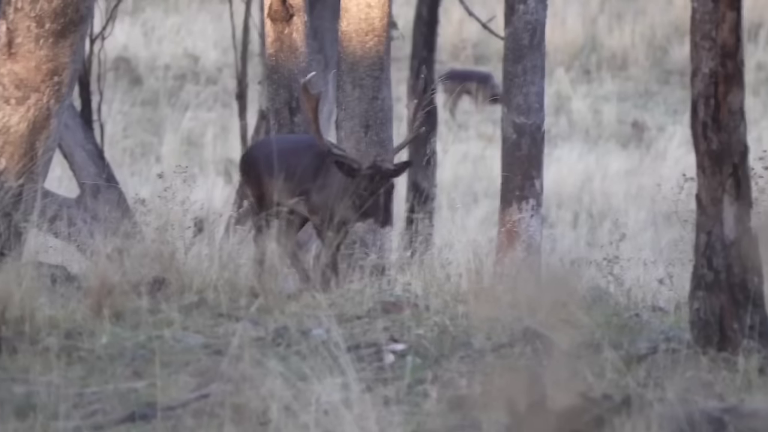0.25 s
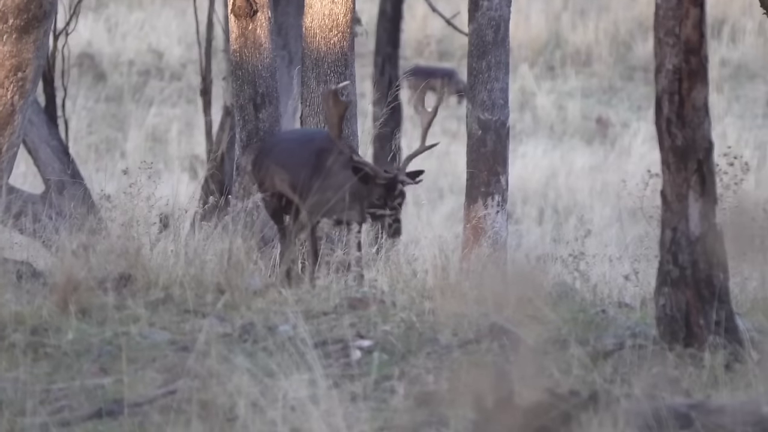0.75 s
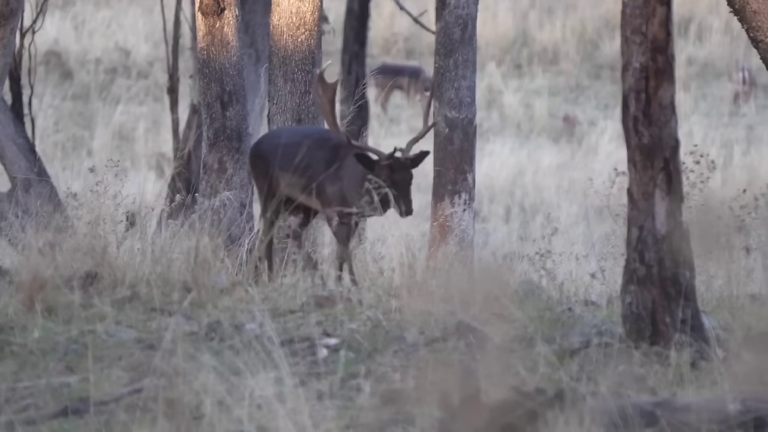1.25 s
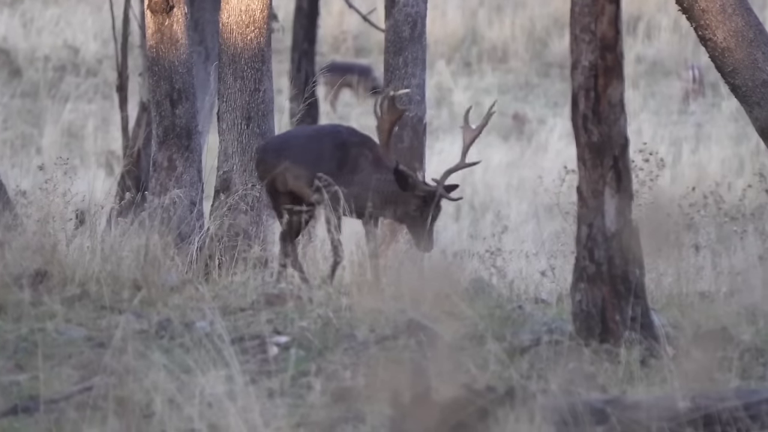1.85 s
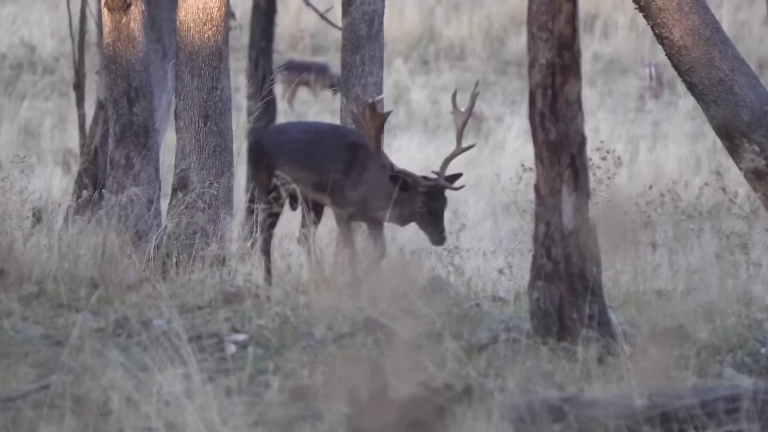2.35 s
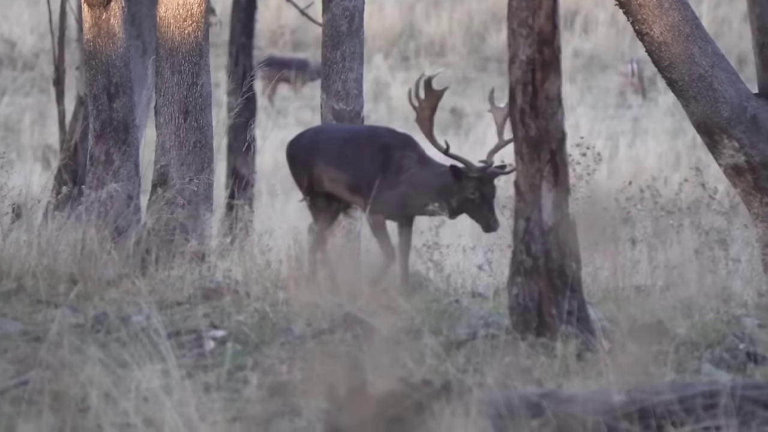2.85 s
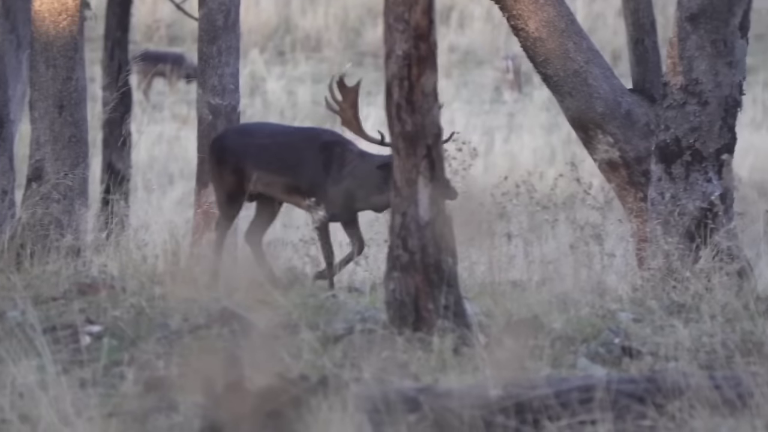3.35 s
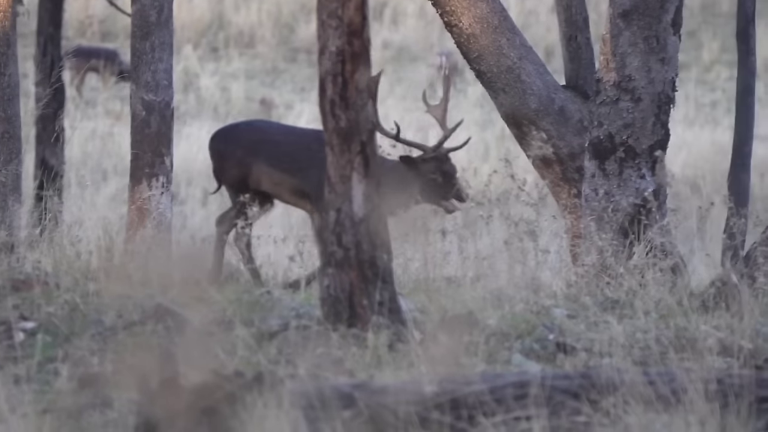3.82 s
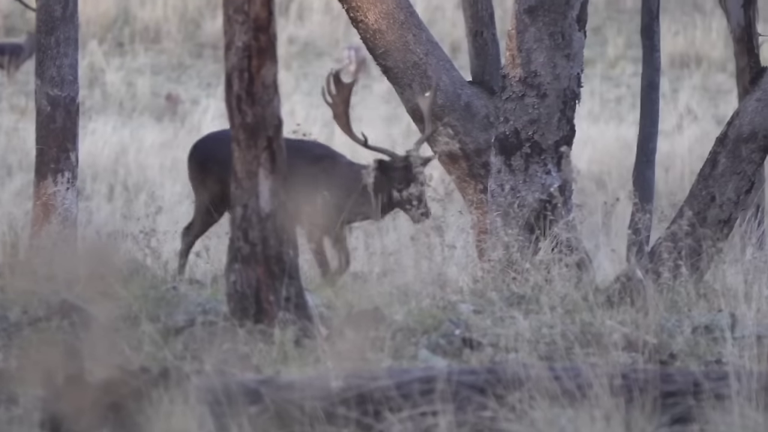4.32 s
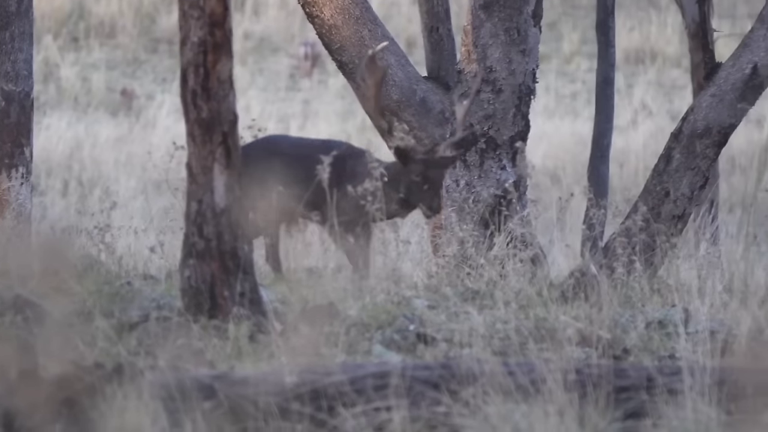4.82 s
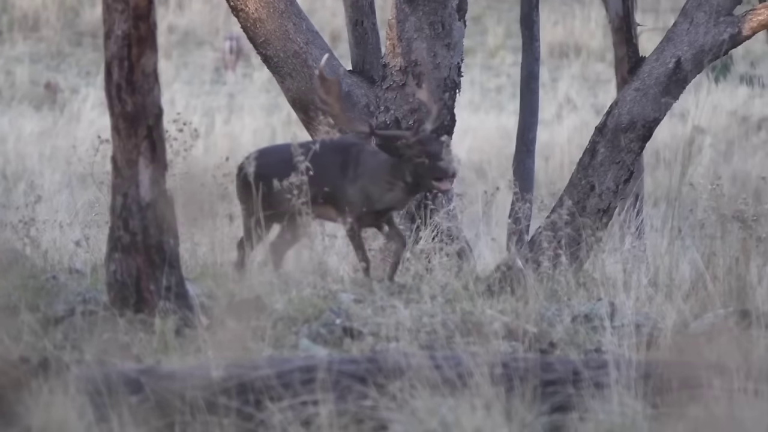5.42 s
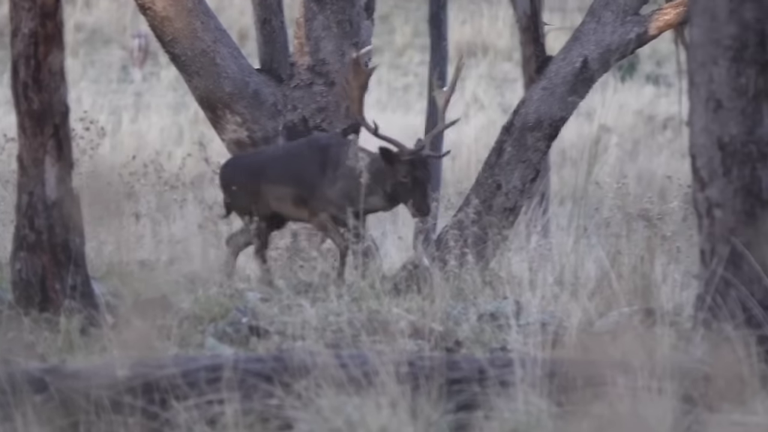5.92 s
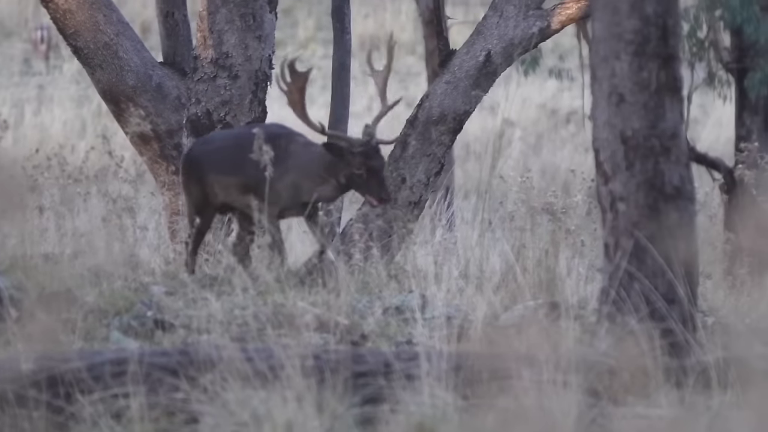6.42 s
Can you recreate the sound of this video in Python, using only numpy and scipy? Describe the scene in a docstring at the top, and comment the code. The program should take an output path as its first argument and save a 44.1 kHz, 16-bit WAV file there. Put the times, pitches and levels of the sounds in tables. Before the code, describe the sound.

In quiet open bush with a low, smooth floor of air and hiss, a rutting buck croaks some way from the microphone. The tail of a faint croak opens the sound, then a firm one starts near 0.27 s, deep and rattling, strongest around 0.7 s. Others follow at about 0.96 and 1.7 s. The croaks at 2.5 and 2.9 s are weak, mostly dull and breathy. Strength returns at 3.3 s, and a long knocking run starts at 4.1 s, followed by another at 4.97 s. The loudest, hardest croak bursts out at 5.57 s, and a final strong one from 6.44 s is cut off at about 6.7 s. Each is a guttural, belch-like roll of some forty slaps a second, ringing a long hollow throat whose tone mostly sinks, with raspy air on top. Small sparse echoes die quickly among the trunks.

```python
"""Among trees in quiet bush, a rutting buck croaks again and again, some way off from the microphone.
Slack vocal folds slap about forty times a second; each slap and its puff of air ring a long throat.
The larynx shifts the throat resonances, which sink through most croaks; hard slaps stand out as knocks.
Trunks scatter the croaks as sparse dying echoes, over a low floor of shaped noise."""
import sys
import numpy as np
from scipy import signal
from scipy.io import wavfile
from scipy.ndimage import uniform_filter1d

SR = 44100
rng = np.random.default_rng(int(sys.argv[2]) if len(sys.argv) > 2 else 0)


def inscribe(sig):
    """Save sig as 16-bit PCM at rate SR to the path in sys.argv[1].

    A 1-D sig is mono; a 2-D sig holds one channel per row.
    Samples are clipped to [-1, 1] before scaling.
    """
    pcm = np.round(np.clip(np.atleast_2d(sig).T, -1, 1) * 32767)
    wavfile.write(sys.argv[1], SR, pcm.astype(np.int16))


N = 294147

# the hardest slaps of the folds: start_s, peak_db (relative), brightness_db
HARD_SLAPS = [(0.265, -44.5, -1.5), (0.343, -34, -2.2), (0.437, -33, -3.4), (0.496, -28.5, -1.5),
              (0.537, -22.5, -0.4), (0.57, -19.5, 0.2), (0.621, -21.5, 0.5), (0.639, -24, 0.5),
              (0.664, -17, 1.4), (0.687, -19, 1.5), (0.748, -27.5, -1), (0.774, -25, -2), (0.797, -26, 1.7),
              (0.847, -31.5, -0.5), (0.963, -41.5, -2), (1.123, -31.5, 0.5), (1.19, -34, 7),
              (1.223, -32, 0), (1.269, -27.5, -3.3), (1.301, -24, -1.8), (1.366, -26.5, -2),
              (1.438, -33.5, -2.3), (1.767, -39.5, 0.1), (1.789, -36, 2), (1.915, -29.5, 0.1),
              (1.946, -24.5, -0.6), (1.98, -21, 2.2), (2.007, -21, 2.5), (2.051, -28, 0.3),
              (2.177, -32, -1.1), (2.21, -35, 1), (2.383, -41.5, 0), (2.468, -44.5, 3), (2.56, -39.5, 0.7),
              (2.913, -41.5, -0.5), (3.063, -34.5, -2), (3.406, -33.5, -0.8), (3.437, -29, 0.5),
              (3.47, -24.5, 1), (3.538, -25, 0.8), (3.587, -24, -3), (3.61, -27, -2.3), (3.703, -30, 1),
              (3.9, -37.5, 0.7), (3.977, -35.5, 0.5), (4.101, -33.5, 1), (4.14, -23, -0.3),
              (4.171, -19.5, 0.3), (4.198, -23, -2.8), (4.273, -21.5, -0.2), (4.307, -21.5, -3),
              (4.333, -20, -1.6), (4.355, -20, -0.5), (4.387, -22, -1.2), (4.41, -20, -0.3),
              (4.468, -24, 1.5), (4.526, -23.5, -0.6), (4.551, -31.5, 2), (4.966, -33, -0.2),
              (4.988, -27.5, -2), (5.018, -19, 0.6), (5.054, -23, -1.4), (5.079, -22, 2.5),
              (5.101, -20.5, -1.1), (5.125, -26, -2.3), (5.186, -31.5, -3), (5.236, -29, 2),
              (5.276, -29, -1), (5.42, -34.5, 2.5), (5.574, -51, -1), (5.607, -26, -1), (5.624, -17, 0.3),
              (5.634, -18, 3.5), (5.665, -14.5, -0.3), (5.685, -17.5, 2), (5.71, -13.5, -0.9),
              (5.736, -15.5, -2.9), (5.761, -16, 0.1), (5.8, -19.5, -1), (5.852, -21.5, 0.5),
              (5.936, -25, -0.8), (6.068, -35, -2.3), (6.117, -36.5, 3), (6.446, -35, 1.5),
              (6.47, -22, -0.9), (6.498, -17, -0.7), (6.55, -16.5, -0.4), (6.587, -27, -4.3)]


def gain_of(db):
    """Turns decibels into an amplitude factor."""
    return 10 ** (np.asarray(db) / 20)


def evened(x):
    """Brings a signal to an rms of 1."""
    return x / np.sqrt(np.mean(x ** 2) + 1e-20)


def read(points, hz):
    """Reads a curve of (Hz, value) points along a logarithmic pitch axis."""
    point_hz, value = np.transpose(points)
    return np.interp(np.log(hz + 1), np.log(point_hz + 1), value)


def resonate(x, hz, width):
    """Shifts the moving pitch hz down to zero, smooths, and shifts back; white noise keeps its rms."""
    turn = np.exp(2j * np.pi * np.cumsum(hz) / SR)
    r = np.exp(-np.pi * width / SR)
    smoothed = signal.lfilter([np.sqrt(2 * (1 - r * r))], [1, -r], x * turn.conj())
    return (turn * smoothed).real


def within(x, edges_hz):
    """Band-pass that keeps the valleys between resonances dark."""
    return signal.sosfilt(signal.butter(2, edges_hz, "band", fs=SR, output="sos"), x)


def puffed(train, puff_s):
    """Envelope of the dying puff of turbulent air after each slap."""
    return signal.lfilter([1], [1, -np.exp(-1 / (puff_s * SR))], train)


def bush():
    """Quiet floor of air and hiss: smooth noise with faint drifting patches in pitch and time."""
    # shape of the floor: pitch_hz, density_db (per Hz, relative)
    floor = [(15, -31), (25, 2), (53, -11), (84, 0.5), (292, -8), (516, -10), (1520, -9), (1890, -11.5),
             (2280, -20), (5270, -22), (6370, -23), (14700, -20), (16000, -10.5)]
    level_db = -61.5  # rms of the whole floor
    frames, hz = N // 256 + 5, np.fft.rfftfreq(1024, 1 / SR)
    real, imaginary, patches = rng.standard_normal((frames, 513, 3)).T
    patches = uniform_filter1d(patches, 12, 0)  # across pitch
    patches = evened(uniform_filter1d(patches, 14, 1))  # along time
    spectrum = (real + 1j * imaginary) * gain_of(read(floor, hz)[:, None] + 1.5 * patches)
    noise = signal.istft(spectrum, nperseg=1024, noverlap=768)[1][:N]
    return gain_of(level_db) * evened(noise)


def trees(x):
    """Sparse echoes of random sign off the trunks, each band dying at its own speed."""
    # how long the echoes last: pitch_hz, t60_s (time to fall by 60 dB)
    decay = [(100, 0.39), (500, 0.43), (1200, 0.28), (3000, 0.083), (8000, 0.4)]
    taps = np.zeros(SR)
    at = np.arange(400, SR - 40, 30) + rng.integers(0, 30, (SR - 441) // 30 + 1)
    taps[at] = rng.choice([-1., 1.], at.shape)
    hz, t, spectrum = signal.stft(taps, SR, nperseg=256)
    dying = spectrum * gain_of(-60 * t / read(decay, hz)[:, None])
    tail = signal.istft(dying, SR, nperseg=256)[1]
    return signal.fftconvolve(x, tail / np.linalg.norm(tail))[:N]


def flutter(effort_db):
    """The folds keep slapping at a near steady pace between the hard slaps, over breath."""
    slaps_per_s, wander_s, spread_db = 41, .002, 2
    breath_db, snap = -5, 0.16  # snap: dB that the slaps gain on the breath for each dB of effort
    hard_s = np.r_[0, np.transpose(HARD_SLAPS)[0], N / SR]
    # a whole number of beats fits between neighbouring hard slaps
    beats = np.r_[0, np.cumsum(np.maximum(np.round(np.diff(hard_s) * slaps_per_s), 1))]
    between = np.setdiff1d(np.arange(beats[-1]), beats)
    shifts, sizes = rng.standard_normal((400, 2))[between.astype(int)].T
    at_s = np.clip(np.interp(between, beats, hard_s) + wander_s * shifts, 0, (N - 1) / SR)
    train = np.zeros(N)
    train[(at_s * SR).astype(int)] = gain_of(spread_db * np.minimum(sizes, 1))
    # each slap is a click followed by its puff
    puffs = gain_of(-18) * puffed(train, puff_s=0.015) * rng.standard_normal(N)
    slaps = evened(puffs - train)
    breath = gain_of(breath_db - snap * (np.clip(effort_db, -65, -35) + 43))
    mixed = slaps + breath * rng.standard_normal(N)
    return gain_of(effort_db) * mixed / np.hypot(1, breath)


def knocks(bright):
    """Clicks of the hard slaps; bright scales how much their brightness counts."""
    start_s, peak_db, brightness_db = np.transpose(HARD_SLAPS)
    train = np.zeros(N)
    train[(start_s * SR).astype(int)] = gain_of(peak_db + 5.5 + bright * brightness_db)
    return train


def folds(effort_db):
    """Soft and hard slaps drive the throat; hard ones feed the dull and sharp parts by their brightness."""
    soft = gain_of(-2.0) * flutter(effort_db)
    swirl = gain_of(-17.0) * rng.standard_normal(N)
    thud, crack = (puffed(slap, puff_s=0.0065) * swirl - slap for slap in (knocks(-2.2), knocks(0.32)))
    deep = soft + 0.58 * thud  # the low throat feels the hard slaps less
    dull, sharp = soft + thud, soft + crack
    # turbulence smears the slaps
    air = np.sqrt(puffed(sharp ** 2, puff_s=0.0074) / 260) * rng.standard_normal(N)
    return deep, dull, sharp, air


def wobble():
    """Three slow chance curves: the soft walls of the airway never hold still."""
    knot_s = .03
    knots = np.arange(0, N / SR + knot_s, knot_s)
    return [np.interp(np.arange(N) / SR, knots, row) for row in rng.standard_normal((len(knots), 3)).T]


def buck():
    """The folds ring all parts of the airway; the larynx shifts most resonances together."""
    # one list a croak: start_s, effort_db, low_hz (moving resonance), then chest_db, mouth_db, rasp_db
    # (these three over effort)
    croaks = [
        [(0.0, -64, 610, 2, 6, -5), (0.02, -62.5, 587, -2, -7, -14), (0.08, -87.5, 586, 25, 15, -9),
         (0.122, -85, 670, 21, -7, -1), (0.13, -75, 603, 9, -17, -19), (0.176, -86, 616.4, 0, 16, -8),
         (0.22, -85, 690, -7, -1, -12), (0.262, -91, 730, 6, 10, -6)],
        [(0.266, -57, 730, -2, -4.5, -9), (0.358, -50, 585, -1.5, 0, -5.5),
         (0.504, -44.5, 690, -6.5, -5.5, -16), (0.618, -45, 600, -17, -2.5, -8),
         (0.674, -38.5, 555, -11.5, -4.5, -12.5), (0.738, -50, 545, -10, 7, -3.5),
         (0.774, -40.5, 550, -19.5, -0.5, -9.5), (0.95, -78.5, 587, -1, -4, -2.5)],
        [(0.96, -62.5, 674, 3, -5.5, -17), (1.098, -57, 587, 9, -2, -9), (1.264, -46, 624, -17, -4.5, -6),
         (1.342, -47, 530, -8, 4.5, -3), (1.366, -40.5, 545, -15, -1.5, -5), (1.428, -47.5, 557, -7.5, 2, -5),
         (1.492, -49.5, 609, -14.5, -5.5, -9), (1.7, -65, 544, -1, -5, -19)],
        [(1.71, -59.5, 600, 0, -9, -13), (1.774, -54.5, 612, -14, 4, 1.5), (1.864, -56.5, 696, 3.5, 0.5, -1),
         (1.978, -38.5, 590, -6.5, -11, -16.5), (2.08, -52, 534, -0.5, 2, -1), (2.186, -53, 560, -10.5, 3, -5),
         (2.24, -57, 530, -6, 2, -9), (2.498, -69.5, 634, -9, -3, -17)],
        [(2.502, -58.5, 614, -9, 3, 3), (2.526, -61, 625, -7, -9, -5), (2.58, -60.5, 607, -8, 7, 5.5),
         (2.614, -57.5, 550, -6, 1, -2), (2.698, -59.5, 565, -4, -4, -3.5), (2.73, -64, 548, 1, -6, -3),
         (2.844, -67.5, 617, -15, -14, -16), (2.905, -64.5, 736, -2, -8, -19)],
        [(2.91, -66, 690, -8, -2.5, -13), (2.946, -58.5, 707, -2, -3, -9), (3.002, -50, 699, -5.5, -7, -17),
         (3.048, -54, 670, -3, -3, -13), (3.058, -49.5, 631, 0.5, -6.5, -14.5),
         (3.238, -58.5, 590, -1, -11, -17), (3.246, -64, 600, -5, -6, -16), (3.3, -62, 620, -16, -12, -18)],
        [(3.31, -62, 600, -14, -13, -7), (3.386, -58, 628, -5, 1, 2), (3.432, -43.5, 651.5, -17, 3, -4.5),
         (3.488, -48, 604, 1, -2, -7.5), (3.62, -42, 572, -7.5, 0, 1), (3.81, -67.5, 590, 0, -7.5, -11.5),
         (3.938, -62.5, 580, -10, -7.5, -22), (4.095, -62, 541, -9, 0, -13)],
        [(4.1, -54, 630, 1, 0, -10), (4.138, -48, 608, -6, -7, -7), (4.254, -38, 580, -4, -7, -3),
         (4.302, -36, 620, -18.5, 0, -4), (4.542, -49.5, 548, -11, 4.5, -8), (4.794, -102, 659, 4, -14, 3),
         (4.95, -94, 647, -6, -2, -9), (4.96, -65, 593, -16, -20, -28)],
        [(4.965, -62, 677, -22, -6, -5.5), (4.985, -54, 659, -17, -9.5, -10.5),
         (5.129, -40, 570, -11.5, 2.5, -1), (5.175, -55, 534.4, -1, 1, 6), (5.189, -43.5, 544, -11, 7.5, -1.5),
         (5.247, -51.5, 630.5, -11, 0, -3), (5.539, -67.5, 660, -4, -16, -29), (5.57, -72, 598, -4, 5, -6)],
        [(5.574, -64, 814, 8, 1, -6), (5.638, -33, 828, -16, -13, -14.5), (5.66, -35.5, 746, -9.5, -4, -13),
         (5.75, -33.5, 668.6, -7, -3.5, -9), (6.09, -52.5, 602.5, -11.5, 2, -8),
         (6.292, -87, 698, -4, -16, -11), (6.424, -86, 659, 1, -2, -7), (6.44, -75, 725, 3, -3, -14)],
        [(6.444, -58, 667, 1, 10, 3), (6.46, -63, 664.4, -2, -10, -14), (6.468, -41.5, 660, -6, 1.5, -9.5),
         (6.564, -33, 634, -9, -6.5, -1.5), (6.574, -53, 642, -1, 11, 0.5), (6.592, -36, 617, -19, 2.5, 2),
         (6.652, -43, 588, -3, -5, -4), (6.67, -39, 620, -4, 2, -5)],
    ]
    # colour of each croak: from_hz, to_hz (central throat resonance at start and end), low_db, moving_db,
    # pocket_db (at the start), fizz_db (over the rasp), tilt_db (chest resonances, per octave);
    # low, moving and pocket are over effort, before their drift within the croak
    colours = [(1090, 1200, 0, 2, -6, -2, -3), (1199, 1133, -1.5, -5, -7, -8.5, 2),
               (1196, 1156, -2, -3, -15, -8.5, 0), (1189, 1133, -1, -1, -4, -9, 1.5),
               (1201, 1146, 0.5, 0, -2, -11, -1), (1170, 1091, 1, 2.5, 2, -1, 3.5),
               (1169.6, 1203, -1, 0, -3, -9, 4), (1238, 1034, -4, -4, -6.5, -10, 5.5),
               (1184, 1046, -4, -5.5, -27, -12.5, -2), (1232, 1042, -8.5, -1, 10, -6, 5.5),
               (1213, 1170, -7.5, -0.5, 4, -9, 2)]
    # resonances with the central one at rest: pitch_hz, width_hz, level_db
    rest_hz = 1170
    chest_modes = [(85.6, 62, -5.5), (137, 80, -5), (201, 32, -8)]
    low_modes = [(447, 47.6, -0.81)]
    mid_modes = [(1111, 27, -12.5), (1195, 72, -1.5), (1327, 56, -6)]
    pocket_modes = [(1720, 270, 0.5)]
    mouth_modes = [(1928, 120, -4.5), (2145, 122, -0.5), (2365, 99, -6)]
    rasp_modes = [(2877, 70, -5.5), (3042, 77, -7), (3290, 380, -1), (3480, 63, -21)]
    fizz_modes = [(4270, 200, -7), (4875, 450, -5), (5940, 580, -8), (6620, 420, -7.5), (7300, 230, -6.5)]
    # band that each part of the airway passes, in the order of parts below: low_hz, high_hz
    ranges = [(46, 210), (370, 499), (500, 960), (960, 1287), (1560, 1870), (1760, 2303), (2650, 3446),
              (3900, 7120), (8500, 14800)]

    t = np.arange(N) / SR
    s, *columns = np.concatenate(croaks).T
    effort_db, low_hz, chest_db, mouth_db, rasp_db = (np.interp(t, s, c) for c in columns)
    starts = np.array([croak[0][0] for croak in croaks])
    which = np.maximum(np.searchsorted(starts, t, "right") - 1, 0)
    age = t - starts[which]
    length_s = np.diff(np.r_[starts, N / SR])[which]

    def fading(seconds):
        """Falls from 1 to 0 as each croak ages."""
        return np.exp(-(age / seconds) ** 2)

    from_hz, to_hz, low_db, moving_db, pocket_db, fizz_db, tilt_db = np.array(colours)[which].T
    centre_hz = from_hz + (to_hz - from_hz) * age / length_s
    pocket_db = pocket_db - 28.5 * (1 - fading(0.14))  # the side pocket fades soon after the start
    fizz_db = rasp_db + fizz_db - 4.5 * fading(0.41)  # the fizz gains on the rasp as a croak goes on
    early = fading(0.28)  # the low throat takes over from the moving resonance
    low_db = low_db - 2.5 * early
    moving_db = moving_db + 2 * (2 * early - 1)

    throat_sway, mouth_sway, lips_sway = wobble()
    centre_hz = centre_hz * (1 + .01 * throat_sway)
    front = 1 + .025 * mouth_sway
    # a resonance behind the lips climbs through the fizz
    lips_start_hz, lips_end_hz, lips_rise_s = 4460, 5700, 0.22
    lips_hz = lips_end_hz + (lips_start_hz - lips_end_hz) * fading(lips_rise_s)
    lips_hz = lips_hz * (1 + .07 * lips_sway * np.minimum(age / lips_rise_s, 1))

    deep, dull, sharp, air = folds(effort_db)
    chest, low, moving, pocket, mouth, rasp, fizz = (gain_of(db) for db in (
        chest_db, low_db, moving_db, pocket_db, mouth_db, rasp_db, fizz_db))

    def ring(modes, drive, sway=1):
        """Rings resonances that follow the central one."""
        return sum(gain_of(db) * resonate(drive, hz * sway * centre_hz / rest_hz, width)
                   for hz, width, db in modes)

    boom = 0
    for mode in chest_modes:
        octaves = np.log2(mode[0] / chest_modes[1][0])
        boom = boom + gain_of(tilt_db * octaves) * ring([mode], chest * deep)
    hiss = fizz * (.5 * sharp + 0.55 * air)
    lips = gain_of(-8) * resonate(hiss, lips_hz, width=250)
    spray = gain_of(-7) * fizz * air  # thin air noise above the fizz
    parts = (boom,
             ring(low_modes, low * deep),
             resonate(moving * deep, low_hz, width=88),
             ring(mid_modes, dull),
             ring(pocket_modes, pocket * dull),
             ring(mouth_modes, mouth * sharp, front),
             ring(rasp_modes, rasp * sharp, 1 / front),
             ring(fizz_modes, hiss) + lips,
             spray)
    return sum(within(part, edges_hz) for part, edges_hz in zip(parts, ranges))


def scene():
    """The buck, its echoes off the trunks, and the bush floor."""
    voice = buck()
    return (voice + gain_of(-8) * trees(voice) + bush())[None]


def record(dry):
    """A gentle bass cut, then a steep upper band limit."""
    edge_hz = 15550
    cut = signal.lfilter(*signal.butter(2, 45, "high", fs=SR), dry)
    limit = signal.firwin(511, edge_hz, window=("kaiser", 9), fs=SR)
    return signal.oaconvolve(cut, limit[None], "same")


dry = scene()
out = record(dry)
inscribe(out)
```